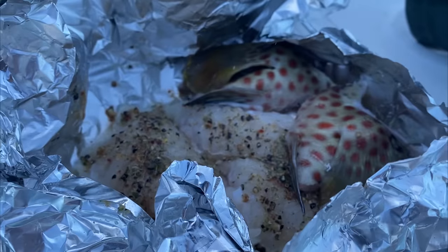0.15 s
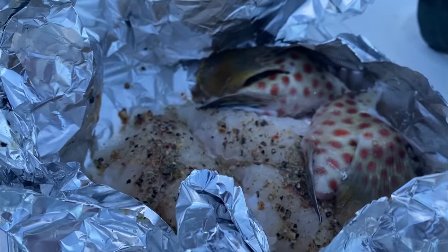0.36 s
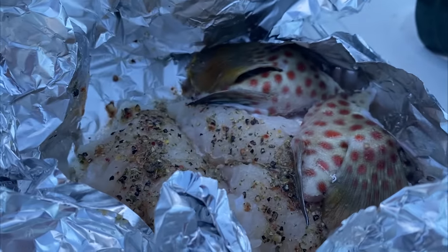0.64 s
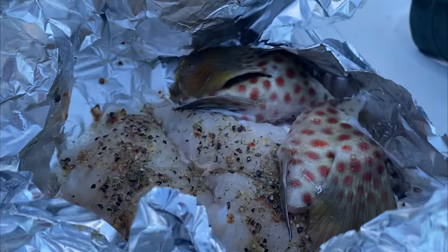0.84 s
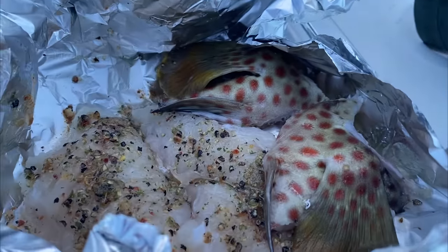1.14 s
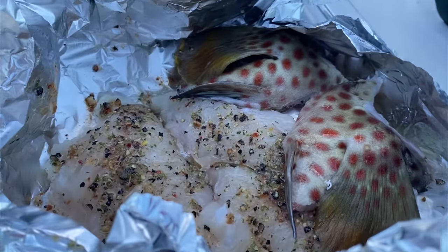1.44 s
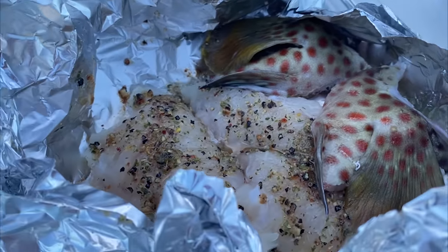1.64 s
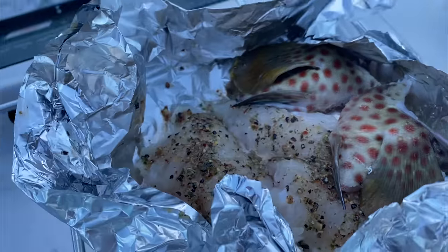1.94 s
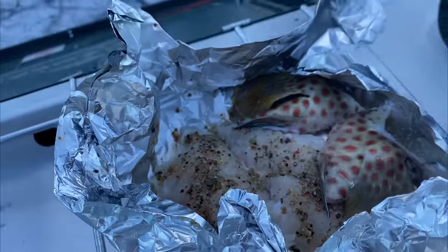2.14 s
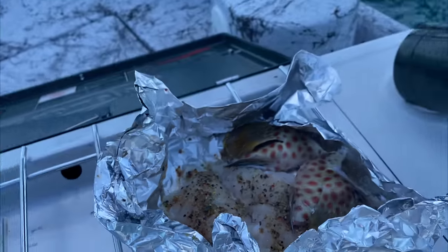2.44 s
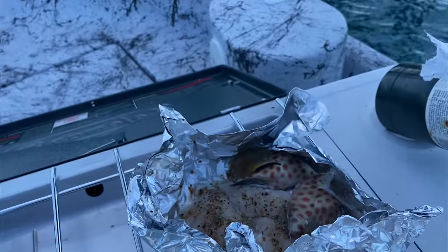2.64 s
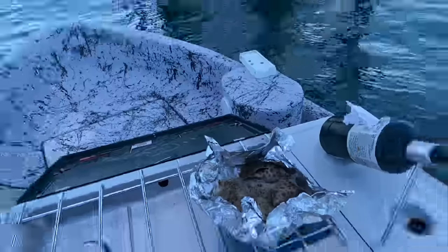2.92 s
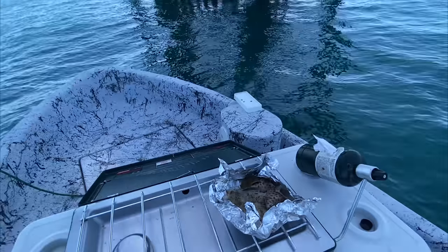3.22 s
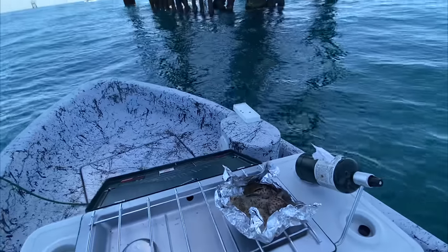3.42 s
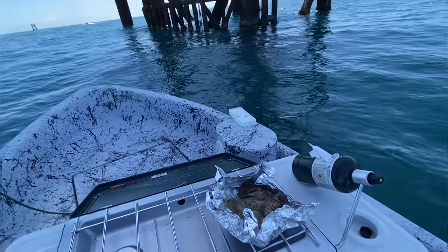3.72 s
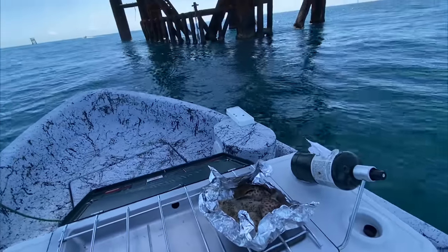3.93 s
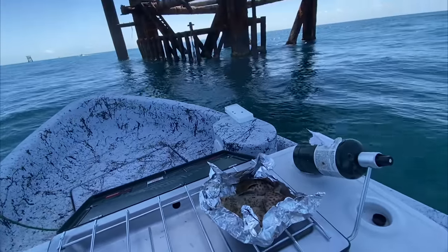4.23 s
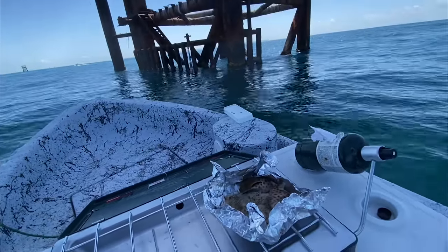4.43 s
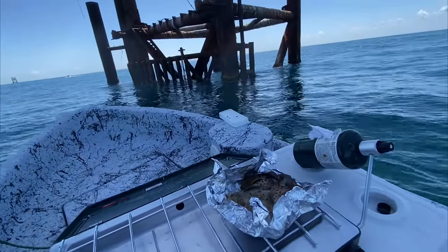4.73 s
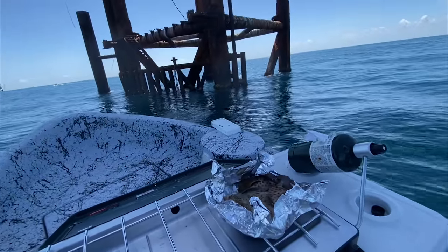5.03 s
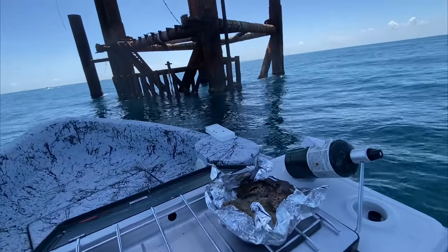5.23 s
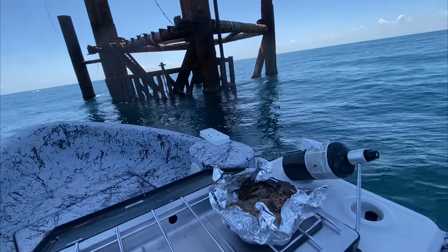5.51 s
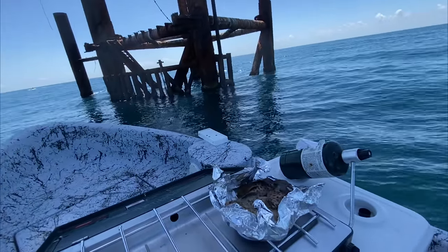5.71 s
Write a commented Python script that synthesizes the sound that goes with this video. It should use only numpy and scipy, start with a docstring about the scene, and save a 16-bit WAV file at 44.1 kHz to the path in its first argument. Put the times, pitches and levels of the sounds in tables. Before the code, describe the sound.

A gas burner roars softly under fish sizzling and popping in foil, close at first, then quieter and more hollow.

```python
"""A gas burner roars under an open foil packet of sizzling fish, on the deck of a small boat.
At first the microphone is close: steam hisses, bubbles ring and burst, and the turbulent flame flutters.
From about 1 s a light breeze bumps the microphone, and at 1.6 s the sound cuts out for an instant.
Between 2 and 3 s the microphone draws back, and the sound grows softer and more hollow as an echo off
the deck interferes with it. To the end, resonances of stove and packet glide as the microphone moves."""
import sys
import numpy as np
from scipy import signal
from scipy.fft import rfft, irfft, next_fast_len
from scipy.io import wavfile
from scipy.ndimage import uniform_filter1d

SR = 44100
rng = np.random.default_rng(int(sys.argv[2]) if len(sys.argv) > 2 else 0)


def int16_out(signal):
    """Quantize to a 16-bit WAV file."""
    q = np.round(np.clip(np.atleast_2d(signal).T, -1, 1) * 32767)
    wavfile.write(sys.argv[1], SR, q.astype(np.int16))


N = 258677
TIME = np.arange(N) / SR
HZ = np.fft.rfftfreq(1024, 1 / SR)
FRAME_S = np.arange(N // 256 + 2) * 256 / SR


def amp(db):
    """Decibel law: level to amplitude ratio."""
    return 10 ** (np.asarray(db) / 20)


def unit_rms(x):
    """Normalisation to an rms of one."""
    return x / np.sqrt(np.mean(x ** 2) + 1e-20)


def curve(rows, at):
    """Linear interpolation of each column against the first."""
    first, *columns = np.transpose(rows)
    return [np.interp(at, first, column) for column in columns]


def spectrum(rows, hz):
    """Interpolation of each column on a logarithmic frequency axis."""
    first, *columns = np.transpose(rows)
    return [np.interp(np.log(hz + 1), np.log(first), column) for column in columns]


def wander(rate_hz):
    """Random modulation: low-passed noise of unit rms."""
    size = next_fast_len(N, True)
    hz = np.fft.rfftfreq(size, 1 / SR)
    return unit_rms(irfft(rfft(rng.standard_normal(size)) / (1 + (hz / rate_hz) ** 2), size)[:N])


def coloured_noise(colour, channels):
    """Spectral shaping: independent noises with one spectrum."""
    size = next_fast_len(N, True)
    db, = spectrum(colour, np.fft.rfftfreq(size, 1 / SR))
    return unit_rms(irfft(rfft(rng.standard_normal((channels, size))) * amp(db), size)[:, :N])


def to_frames(x):
    """Short-time Fourier analysis into channels, bins, frames."""
    return signal.stft(x, nperseg=1024, noverlap=768)[2][..., :len(FRAME_S)]


def to_sound(frames):
    """Overlap-add synthesis of a waveform from short-time spectra."""
    return signal.istft(frames, nperseg=1024, noverlap=768)[1][..., :N]


def band_rms(gain, low_hz, high_hz):
    """Power summation: the rms that white noise keeps in a band after this gain, per frame."""
    return np.sqrt((gain[(HZ > low_hz) & (HZ < high_hz)] ** 2).sum(0) / len(HZ))


# Path of the microphone (time [s], distance [0 over the packet, 1 drawn back])
MIC_DISTANCE = [(0, 0.17), (.3, 0.092), (1.85, 0.12), (2.4, 0.34), (3.0, 0.77), (5.87, 0.91)]
def distance(at):
    """Relative distance from source to microphone, 0-1."""
    return np.clip(curve(MIC_DISTANCE, at)[0], 0, 1)


def by_distance(close, back):
    """Linear crossfade between two spectra as the microphone draws back."""
    return np.outer(close, 1 - distance(FRAME_S)) + np.outer(back, distance(FRAME_S))


# Loudness of the stove along the microphone's path (time [s], level [dB])
STOVE_LEVEL = [(0, -35.5), (1.5, -35), (2.0, -36.5), (2.65, -42.5), (3.5, -46.5), (4.35, -45.5),
               (4.56, -42.5), (5.05, -42.5), (5.87, -41)]
def layer_gain(close_db, follow, at, reference_db=-35, fade_db=-8, fade_s=0.26):
    """Attenuation with distance: a layer fades in, then takes `follow` times the stove's fall in dB."""
    fall_db = curve(STOVE_LEVEL, at)[0] - reference_db
    return amp(close_db + follow * fall_db + fade_db * np.maximum(1 - at / fade_s, 0))


# Relation between the two microphone ports, close and drawn back
# (frequency [Hz], left minus right [dB], coherence [0-1], left phase lead [rad])
PORT_PAIR_CLOSE = [(80, 7, 0.75, 1), (270, 2, 1, 0.38), (560, 8, 1, 1.2), (690, 11.5, 0.85, 0.3),
                   (850, 14, 0.5, -1.5), (1260, 5, 0.08, 3.5), (1870, 2, 1, 5), (2820, 2.5, 0.52, 8.5),
                   (3520, 5, 0.74, 6), (4800, 9, 1, 7.5), (6030, 3, 0.9, 7), (6330, -5.5, 0, -11.5),
                   (6650, -1, 1, 6.5), (10950, 0, 1, 0.5), (14800, -0.5, 0.8, -6)]
PORT_PAIR_BACK = [(78, 1, 1, -2), (275, -0.5, 0.97, 0.37), (440, 4, 0.67, 1.5), (630, 7.5, 1, 0.55),
                  (1020, 3.5, 0.75, 1.25), (1480, -0.5, 0.91, 1.03), (1870, -2, 0.43, 3),
                  (3320, 1, 0.9, 4.5), (4440, 4.5, 0.26, 5), (5180, 5.5, 0.098, 9), (6960, 1.5, 0.31, 5.5),
                  (8400, 8, 0.2, 5), (8860, 0.5, 0.86, 3.5), (16100, -1, 0.84, -8)]
def ports(frames):
    """Partial coherence: two ports hear the stove partly alike, differing in level and phase."""
    side_db, coherence, lead = map(by_distance, curve(PORT_PAIR_CLOSE, HZ), curve(PORT_PAIR_BACK, HZ))
    coherence, ratio = np.clip(coherence, 0, 1), amp(side_db)
    left = ratio * frames[0]
    right = (coherence * frames[0] + np.sqrt(1 - coherence ** 2) * frames[1]) * np.exp(-1j * lead)
    return to_sound(np.array([left, right]) * np.sqrt(2 / (1 + ratio ** 2)))


# Reflection off the deck (time [s], delay [ms], strength [0-1], onset of scattering [Hz])
DECK_REFLECTION = [(2.3, 2.2, 0, 1100), (3.3, 2.06, 0.62, 1160), (4.0, 1.93, 0.43, 1150),
                   (4.6, 1.95, 0.47, 1220), (5.2, 1.78, 0.44, 1550), (5.87, 1.87, 0.5, 1600)]
def deck_echo(phase_rad=1.96, treble_share=0.12):
    """Comb filtering: a delayed copy interferes; the uneven deck scatters most of its treble away."""
    delay_ms, strength, scatter_hz = curve(DECK_REFLECTION, FRAME_S)
    delay_cycles = HZ[:, None] * delay_ms / 1000
    specular = treble_share + (1 - treble_share) / (1 + (HZ[:, None] / scatter_hz) ** 4)
    echo = strength * specular * np.exp(1j * (phase_rad - 2 * np.pi * delay_cycles))
    return abs(1 + echo) / np.sqrt(1 + abs(echo) ** 2)


# Spectrum of wind on the ports (frequency [Hz], relative level [dB])
WIND_SPECTRUM = [(20, -26), (35, -10), (55, 10.5), (80, 2), (130, -3), (250, -30), (600, -68)]
# Gusts (centre time [s], half length [s], level [dB])
WIND_GUSTS = [(1.2, 0.078, -53), (1.471, .06, -48), (1.82, 0.039, -45), (3.63, 0.13, -53),
              (4.05, 0.12, -63), (4.97, 0.1, -62), (5.37, 0.034, -55), (5.85, 0.05, -62)]
def breeze(draught_db=-75, uneven_db=3):
    """Turbulent pressure: a light draught and a few gusts buffet each port with its own noise."""
    draught = amp(draught_db + uneven_db * wander(rate_hz=4.4))
    gusts = sum(amp(db) * np.exp(-((TIME - s) / half_s) ** 2) for s, half_s, db in WIND_GUSTS)
    return (draught + gusts) * coloured_noise(WIND_SPECTRUM, channels=2)


# Spectrum of the flame's flutter (frequency [Hz], relative level [dB])
FLUTTER_SPECTRUM = [(20, -36), (35, -11), (55, 0.5), (80, 0), (120, 0.5), (200, -12.5), (500, -67)]
def flutter(close_db=-46.5, back_db=-5.5, start_db=-11, build_s=0.98, uneven_db=1):
    """Unsteady combustion: a low rumble builds up, alike at both ports and strong only close by."""
    build_db = start_db * np.maximum(1 - TIME / build_s, 0)
    change_db = back_db * distance(TIME) + build_db + uneven_db * wander(rate_hz=1.6)
    gain = layer_gain(close_db, follow=0.93, at=TIME) * amp(change_db)
    return gain * coloured_noise(FLUTTER_SPECTRUM, channels=1)


# Strongest puffs of the flame (centre time [s], level [dB], frequency [Hz])
FLAME_PUFFS = [(.273, -37.5, 117), (.35, -40, 115), (0.797, -38, 95), (.976, -42, 93.2), (1.198, -33, 77.9),
               (1.322, -32, 72.5), (1.418, -37, 87), (1.534, -40, 105), (1.706, -34, 170), (1.724, -38, 75),
               (1.866, -39.5, 61.6), (2.077, -30, 90), (2.203, -38, 80), (3.657, -45, 71.2),
               (3.815, -46, 90.2), (5.392, -48, 94)]
def puffs(half_s=0.0098, ragged_cycles=0.14):
    """Volume source: the flame bulges in a draught, a soft, ragged push of a few cycles."""
    phase_slip = ragged_cycles * wander(rate_hz=45)
    out = np.zeros(N)
    for s, db, hz in FLAME_PUFFS:
        envelope = amp(db) * np.exp(-((TIME - s) / half_s) ** 2)
        out += envelope * np.sin(2 * np.pi * (hz * TIME + phase_slip + rng.random()))
    return out


def flare(flare_db=2.5, half_s=0.022):
    """Amplitude modulation, in dB: the roar swells with each puff, in step with its strength."""
    strongest_db = max(db for _, db, _ in FLAME_PUFFS)
    return flare_db * sum(amp(db - strongest_db) * np.exp(-((FRAME_S - s) / half_s) ** 2)
                          for s, db, _ in FLAME_PUFFS)


def resonance(centre_hz, lift_db, half_width_hz):
    """Lorentzian peak in dB, frame by frame."""
    return lift_db / (1 + ((HZ[:, None] - centre_hz) / half_width_hz) ** 2)


# Hollow colour of the stove (time [s], resonance [Hz], lift [dB], notch [Hz], depth [dB])
STOVE_CAVITY = [(3.0, 690, -0.5, 860, -2), (3.65, 720, 6, 900, 4), (4.2, 795, 4, 980, 4),
                (4.7, 870, 4.5, 1020, 2), (5.2, 890, 5.5, 1000, 3), (5.87, 910, 4, 1000, 5)]
def stove_cavity():
    """Cavity resonance, in dB: a peak and a notch above it grow and climb as the microphone lifts."""
    peak_hz, lift_db, notch_hz, depth_db = curve(STOVE_CAVITY, FRAME_S)
    peak = resonance(peak_hz, lift_db, half_width_hz=65)
    notch = resonance(notch_hz, depth_db, half_width_hz=50)
    return peak - notch


# Spectrum of the roar (frequency [Hz], relative level close [dB], relative level drawn back [dB])
ROAR_SPECTRUM = [(40, -44, -32), (111, -5.5, -7.5), (176, -2.5, -9), (235, 6, 1.5), (345, -1.5, -0.5),
                 (376, -5.5, -12), (453, -1.5, -4.5), (602, -1, -3.5), (790, -7, -7.5), (874, -7.5, -5.5),
                 (995, -8, -9.5), (1126, -14, -12), (1364, -13.5, -12), (2200, -35, -21.5)]
# Brightness as the microphone's view of the flame changes (time [s], slope [dB/octave])
ROAR_SLOPE = [(2.4, 4), (3.3, 1.5), (4.2, 1.6), (4.8, 2), (5.3, 3), (5.87, 3)]
def flame(roar_db=-37.0, waver_db=0.9, cutoff_hz=2600):
    """Combustion noise: turbulent burning gas roars, coloured by the stove's hollow body."""
    octaves = np.log2(np.clip(HZ, 450, 1400) / 450)
    tilt_db = np.outer(octaves, curve(ROAR_SLOPE, FRAME_S)[0])
    colour_db = by_distance(*spectrum(ROAR_SPECTRUM, HZ)) + tilt_db + stove_cavity()
    colour = amp(colour_db) / (1 + (HZ[:, None] / cutoff_hz) ** 6)
    gain = layer_gain(roar_db, follow=0.61, at=FRAME_S) * amp(flare()) / band_rms(colour, 160, 1700)
    turbulence = rng.standard_normal((2, N)) * amp(waver_db * wander(rate_hz=28))
    return colour * gain * to_frames(turbulence)


# Collapsing patches of froth (time [s], length [s], bubble level [dB], centre pitch [Hz])
FROTH_PATCHES = [(.24, 0.017, -30, 2160), (.405, .02, -31, 2520), (.458, 0.067, -31, 2300),
                 (.608, .016, -30, 2250), (0.656, .012, -31, 2200), (0.698, 0.046, -27.5, 2250),
                 (.805, .028, -29, 2250), (0.91, 0.041, -29, 2600), (0.974, .018, -29, 1992),
                 (1.189, 0.037, -30.5, 2157), (1.484, 0.047, -31.5, 1990), (1.636, .04, -31, 2330),
                 (2.023, .04, -33, 2270)]
def crackles(per_s=240, decay_cycles=3, pitch_spread=0.14, spread_db=1.5, splash_gain=0.27):
    """Bubble resonance: froth collapses in a quick run of similar pitches, each with a tiny splash."""
    t, out = np.arange(500) / SR, np.zeros((2, N))
    for s, length_s, db, centre_hz in FROTH_PATCHES:
        count = max(round(length_s * per_s), 1)
        for k in range(count):
            hz = centre_hz * np.exp(pitch_spread * rng.standard_normal())
            ring = np.sin(2 * np.pi * (hz * t + rng.random((2, 1))))
            splash = splash_gain * rng.standard_normal((2, len(t)))
            start = round((s + length_s * (k + rng.random()) / count) * SR)
            envelope = amp(db + spread_db * rng.standard_normal()) * np.exp(-t * hz / decay_cycles)
            out[:, start:start + len(t)] += envelope * (ring + splash)
    return to_frames(out)


# Largest bursting bubbles (time [s], level [dB], pitch [Hz], share of ring [0-1], splash decay [s])
LARGE_BUBBLES = [(0.273, -19, 4740, .4, .003), (0.2942, -8.5, 2200, 0.68, 0.0022),
                 (0.4805, -19, 2340, 0.54, .003), (.512, -22, 2050, 0.4, .003),
                 (0.55, -10, 6800, 0.64, 0.0023), (0.6765, -19, 1827, 0.73, .003),
                 (0.8147, -24, 2700, 0.3, 0.0045), (0.9106, -29, 2750, .4, .0025),
                 (.936, -20, 2590, 0.6, 0.0043), (1.195, -25, 3500, .2, 0.0045),
                 (1.49, -16, 2010, 0.38, 0.0022), (1.516, -14, 1960, 0.78, 0.0018),
                 (1.526, -22, 2330, 0.4, .003), (1.5844, -4, 6810, 0.82, 0.0013),
                 (2.199, -22, 4100, 0.5, .002), (2.269, -20.5, 5200, .35, .0025),
                 (2.483, -22, 1400, 0.9, 0.002), (2.6573, -24, 4500, 0.37, .002),
                 (2.759, -26, 2900, 0.3, 0.0018), (3.53, -29, 3500, 0.4, 0.0018),
                 (3.8497, -31, 3480, 0.5, .002), (4.0695, -36, 3500, .3, 0.0018),
                 (4.176, -30.5, 2980, 0.25, 0.006), (4.62, -25, 4500, .3, 0.0018),
                 (4.771, -26.5, 5500, 0.4, 0.0023), (5.311, -23, 4700, 0.4, 0.0031),
                 (5.366, -30.5, 5500, .1, 0.0046)]
def pops(rise_s=0.00054, decay_cycles=2.2):
    """Damped oscillation: a large bubble rings for a few cycles and throws a brief splash at the foil."""
    t, out = np.arange(1200) / SR, np.zeros((2, N))
    attack = 1 - np.exp(-t / rise_s)
    for s, db, hz, ring_share, splash_s in LARGE_BUBBLES:
        ring = np.exp(-t * hz / decay_cycles) * np.sin(2 * np.pi * (hz * t + rng.random((2, 1))))
        band = signal.butter(1, [0.8 * hz, 2 * hz], "bandpass", fs=SR)
        splash = unit_rms(signal.lfilter(*band, rng.standard_normal((2, len(t))))) * np.exp(-t / splash_s)
        start = round(s * SR)
        out[:, start:start + len(t)] += amp(db) * attack * (ring_share * ring + (1 - ring_share) * splash)
    return to_frames(out)


def impulses(per_s, spread_db):
    """Poisson process: randomly timed impulses, many small and a few large."""
    return (rng.random(N) < per_s / SR) * amp(spread_db * np.minimum(rng.exponential(1, N), 4))


def spit_power(per_s, spread_db, decay_s):
    """Shot noise: the power of tiny steam spits, each starting at once and dying fast; mean one."""
    power = signal.lfilter([1], [1, -np.exp(-2 / (decay_s * SR))], impulses(per_s, spread_db) ** 2)
    return power / power.mean()


def bubbles(low_hz, high_hz, per_s, spread_db, decay_cycles, pitches):
    """Superposition of damped resonators: bubbles burst in the juice, each a short ring."""
    t, out = np.arange(700) / SR, np.zeros((2, N))
    for hz in np.geomspace(low_hz, high_hz, pitches):
        ring = np.exp(-t * hz / decay_cycles) * np.sin(2 * np.pi * (hz * t + rng.random((2, 1)))) * hz
        out += signal.oaconvolve(impulses(per_s / pitches, spread_db)[None], ring, axes=1)[:, :N]
    return unit_rms(out)


# Three modes of the open packet at the moving microphone (time [s], frequency [Hz], lift [dB])
LOW_MODE = [(.6, 4740, 4.5), (1.2, 4850, 4.5), (2.7, 4613, 1), (3.05, 4370, 7), (3.4, 4850, -3.5),
            (4.3, 5030, 2), (4.9, 5050, 3), (5.25, 4670, 2), (5.87, 4650, 4)]
MIDDLE_MODE = [(2.7, 5200, 1.5), (3.55, 5350, 3), (4.05, 5430, 1), (4.6, 5580, 6), (4.92, 5600, -2),
               (5.25, 5500, 3.5), (5.87, 5260, 9.5)]
HIGH_MODE = [(2.6, 6550, 0), (3.1, 6430, 5), (3.5, 6400, -2), (4.3, 6400, 0), (4.7, 6300, 3),
             (5.3, 6400, 2.5), (5.55, 6700, 2), (5.87, 6800, 7)]
def packet_modes():
    """Resonance of the open packet, in dB: three narrow peaks slide, swell and fade."""
    tracks = [curve(rows, FRAME_S) for rows in (LOW_MODE, MIDDLE_MODE, HIGH_MODE)]
    return sum(resonance(hz, lift_db, half_width_hz=185) for hz, lift_db in tracks)


def hiss_ripple(close_db=0.8, back_db=2.05):
    """Spectral ripple, in dB: fine random peaks and dips drift through the hiss, stronger further back."""
    ripple = rng.standard_normal((len(HZ), len(FRAME_S)))
    for _ in range(2):
        ripple = uniform_filter1d(ripple, size=4, axis=0)  # across frequency
        ripple = uniform_filter1d(ripple, size=70, axis=1, mode="wrap")  # across time
    return by_distance(close_db, back_db) * unit_rms(ripple)


# Spectrum of the sizzle (frequency [Hz], relative level close [dB], relative level drawn back [dB])
SIZZLE_SPECTRUM = [(900, -28, -27), (1615, -7, -2.5), (1996, 3.5, -1.5), (2160, -2.5, 1), (2400, -1, -0.5),
                   (2760, -2, -5), (3100, -2, 1.5), (3340, -3.5, -3), (4200, 0, -3), (5440, -3.5, -1),
                   (5800, -4, -5), (6280, 4, -2.5), (7050, -1, -6), (8160, 0.5, -9.5), (8600, -6, -4),
                   (11400, -3, -6), (16300, -8.5, -6)]
def sizzle(body_db=-36.5, fizz_db=-33.5, steam_db=-5.0, fine_db=-6, coarse_db=-17, surge_db=0.5):
    """Boiling noise: juice on the foil gives a steam hiss, dense spits and bubbles, surging together."""
    power = amp(steam_db) ** 2 + spit_power(per_s=1000, spread_db=3.5, decay_s=0.011)
    steam = unit_rms(np.sqrt(power) * rng.standard_normal((2, N)))
    fine = bubbles(2600, 15150, per_s=2400, spread_db=3.0, decay_cycles=5.9, pitches=44)
    coarse = bubbles(1350, 2860, per_s=600, spread_db=6.5, decay_cycles=4, pitches=14)
    coarse *= amp(0.5 * distance(TIME))  # a slightly larger share from further back
    boil = unit_rms(steam + amp(fine_db) * fine + amp(coarse_db) * coarse)
    boil *= amp(surge_db * wander(rate_hz=31.0))
    colour_db = by_distance(*spectrum(SIZZLE_SPECTRUM, HZ)) + packet_modes() + hiss_ripple()
    colour = amp(colour_db) / (1 + (800 / (HZ[:, None] + 1)) ** 4)  # high-pass at 800 Hz
    body_gain = layer_gain(body_db, follow=0.92, at=FRAME_S) / band_rms(colour, 1320, 6270)
    # Directivity: the finest fizz beams upward out of the packet, so it falls away faster.
    fizz_gain = layer_gain(fizz_db, follow=1.207, at=FRAME_S) / band_rms(colour, 6000, 14600)
    fizz_share = np.clip((HZ[:, None] - 5700) / 2200, 0, 1)
    return colour * (body_gain * (1 - fizz_share) + fizz_gain * fizz_share) * to_frames(boil)


def scene():
    """Superposition: burner and packet reach the two ports with the deck's echo, over the low rumble."""
    stove = flame() + sizzle() + pops() + crackles()
    return ports(deck_echo() * stove) + flutter() + puffs() + breeze()


def record(dry, gap_start_s=1.6032, gap_end_s=1.6318, drop_db=-22, fall_db_per_s=1700, edge_hz=16000):
    """Gating and band limiting: the sound cuts out for an instant, and its highest treble is removed."""
    in_gap = (TIME > gap_start_s) & (TIME < gap_end_s)
    gate_db = in_gap * (drop_db - fall_db_per_s * (TIME - gap_start_s))
    gate = uniform_filter1d(amp(gate_db), size=12)
    lowpass = signal.firwin(511, edge_hz, window=("kaiser", 9), fs=SR)
    return signal.oaconvolve(dry * gate, lowpass[None], "same")


dry = scene()
out = record(dry)
int16_out(out)
```